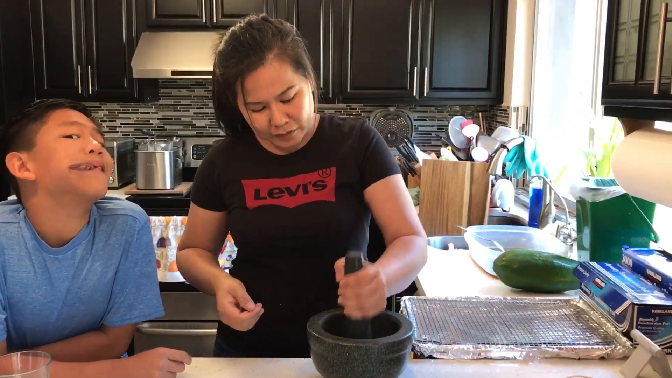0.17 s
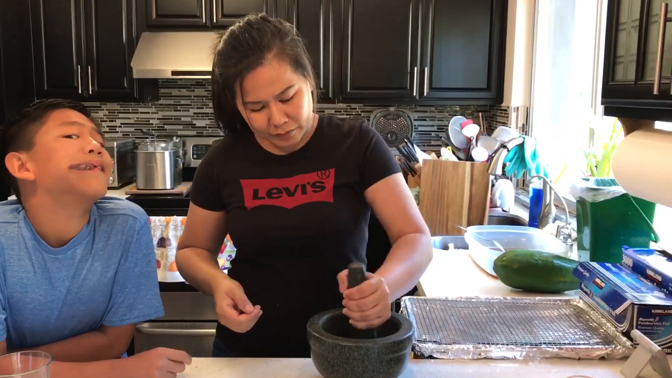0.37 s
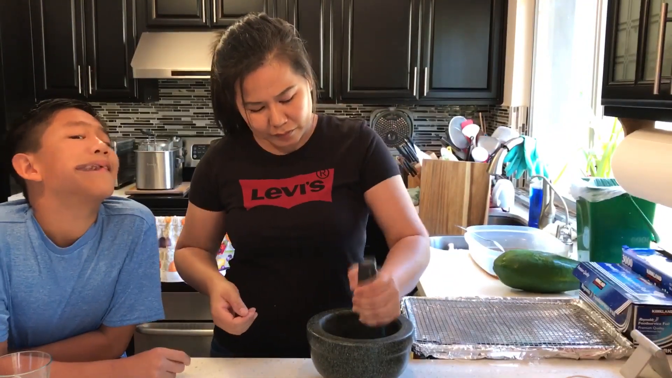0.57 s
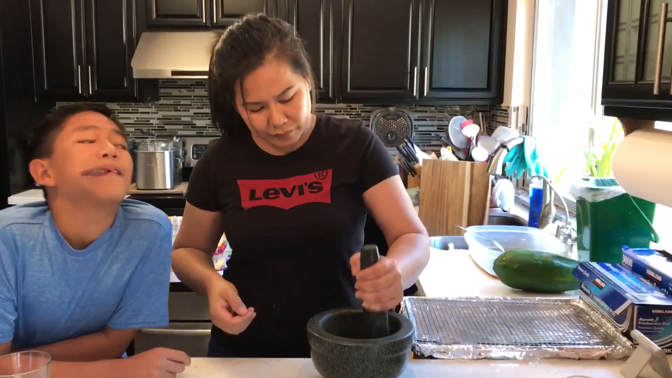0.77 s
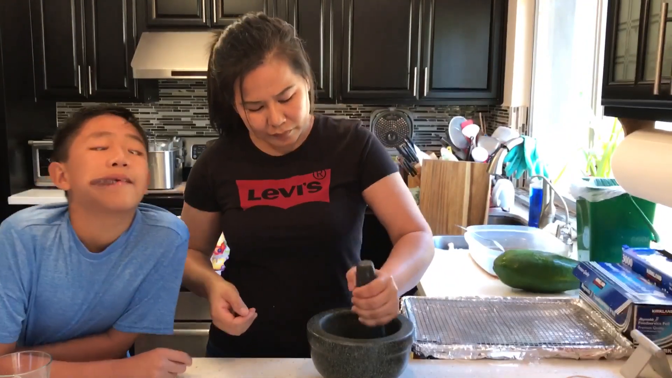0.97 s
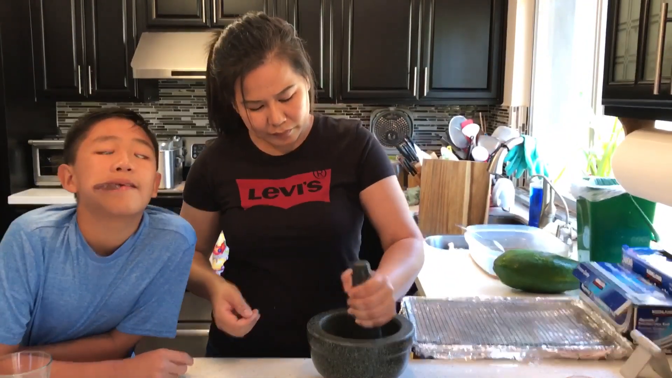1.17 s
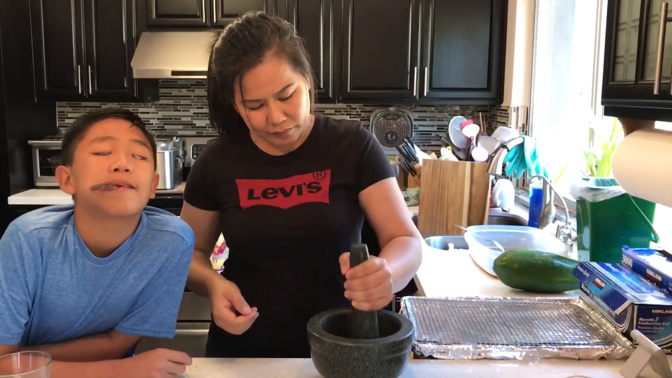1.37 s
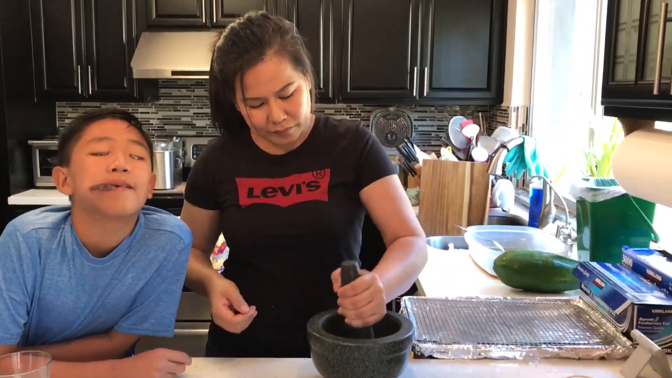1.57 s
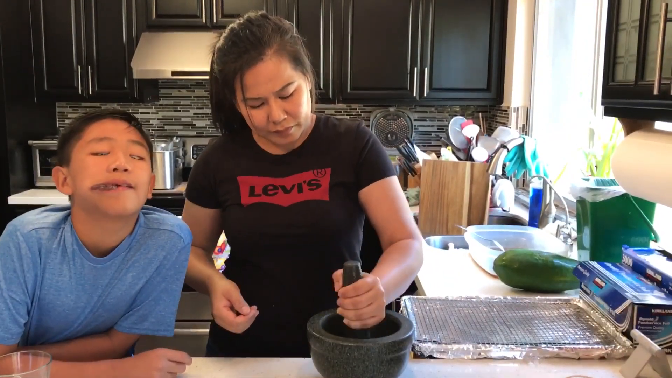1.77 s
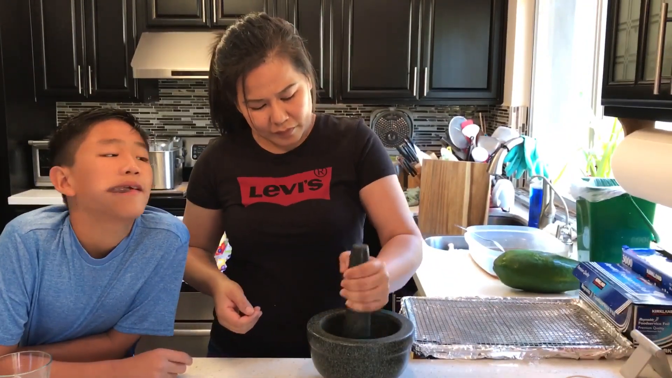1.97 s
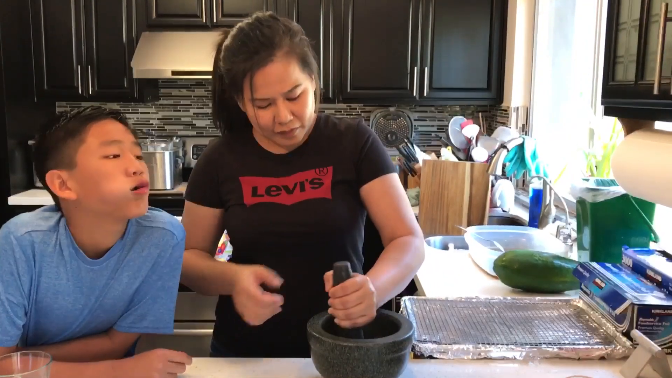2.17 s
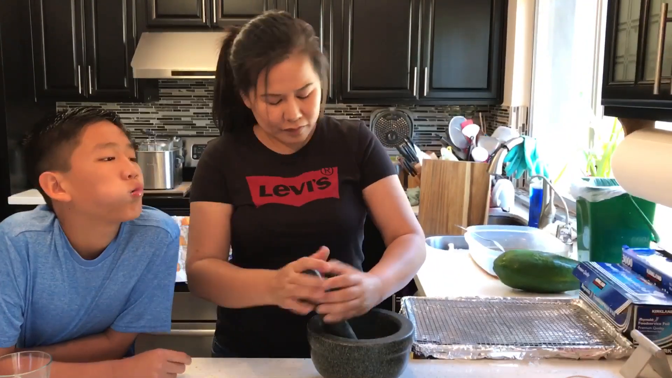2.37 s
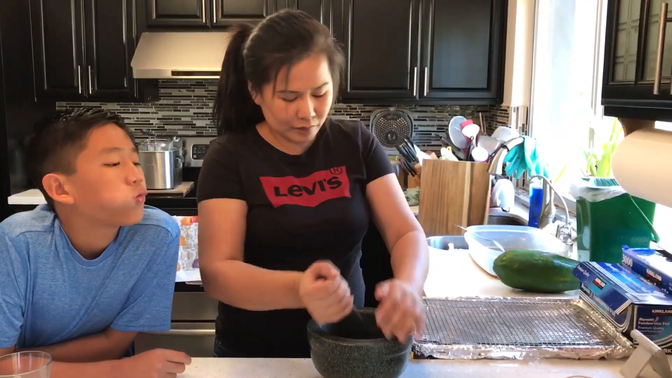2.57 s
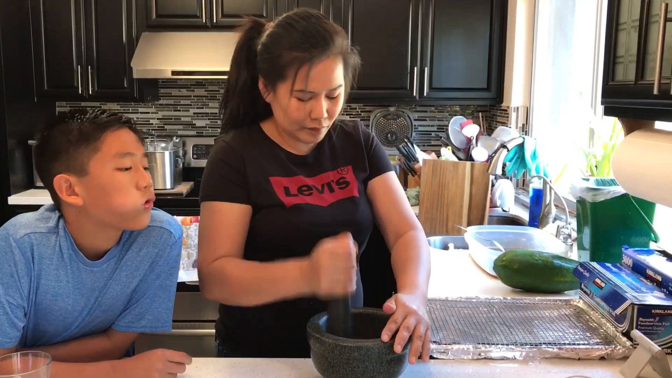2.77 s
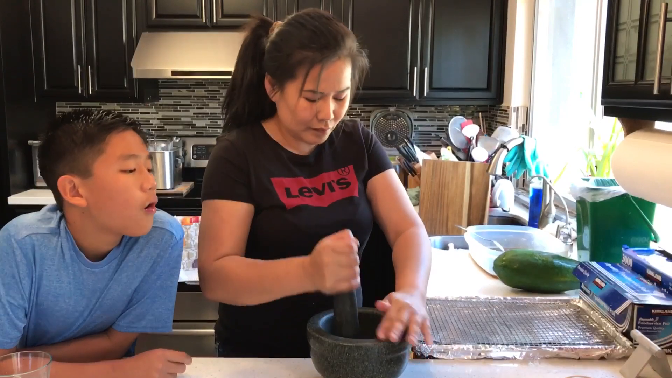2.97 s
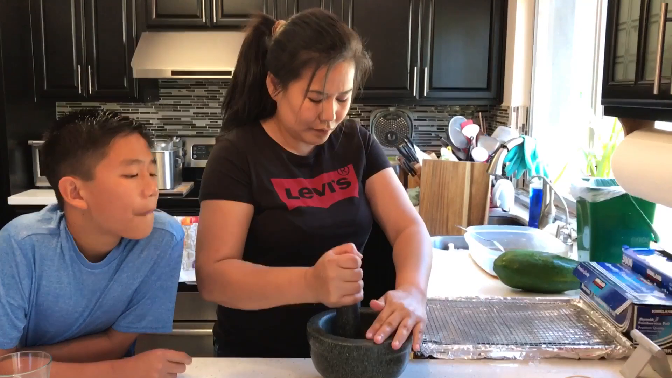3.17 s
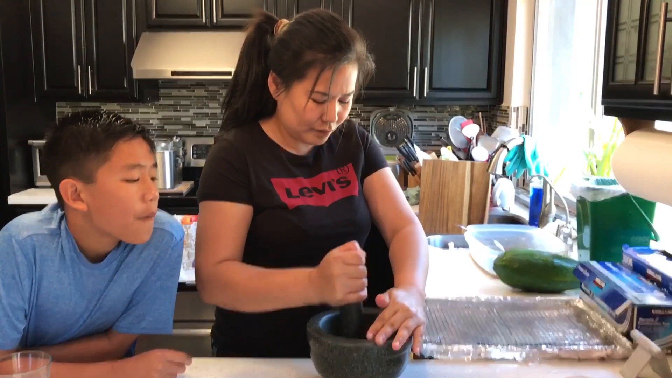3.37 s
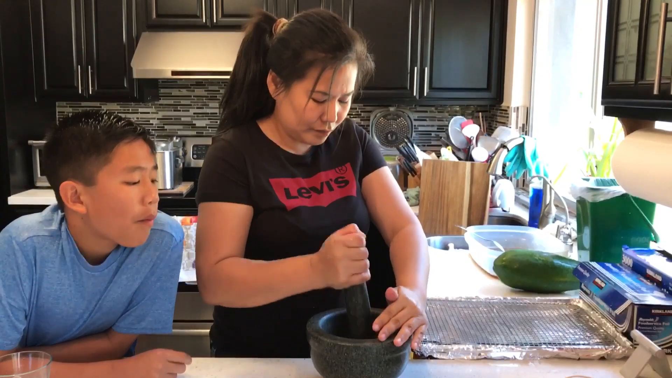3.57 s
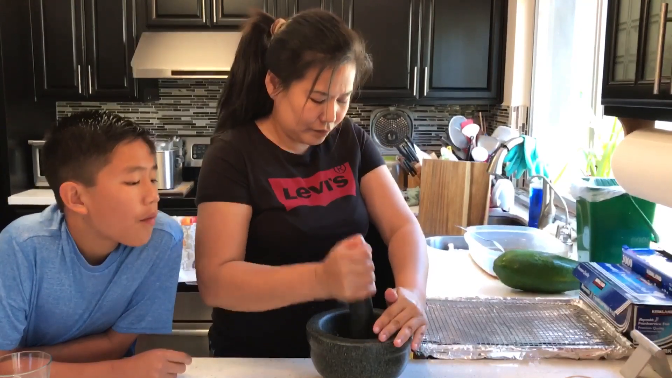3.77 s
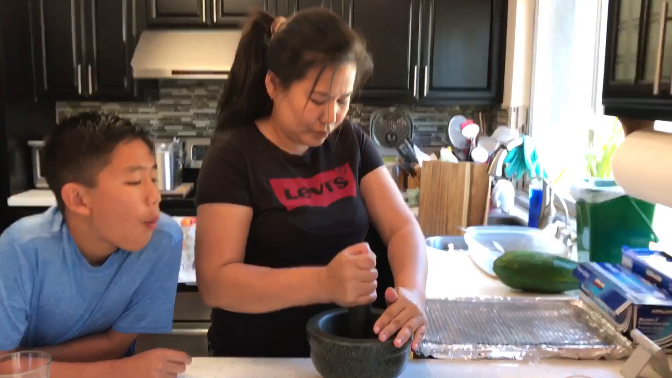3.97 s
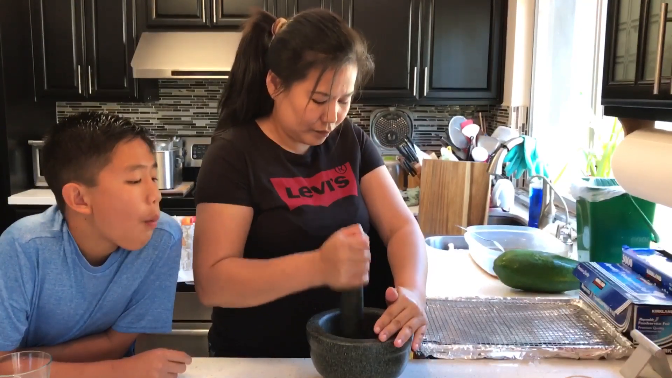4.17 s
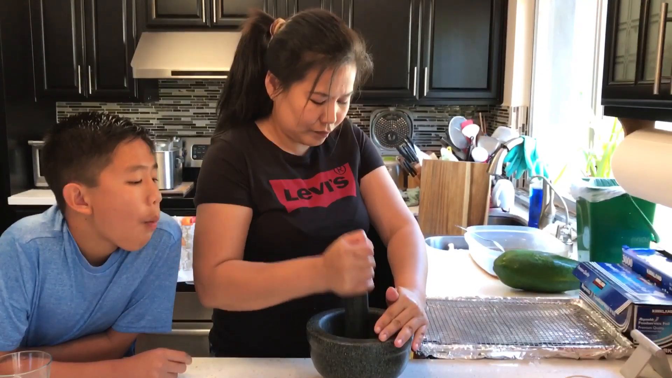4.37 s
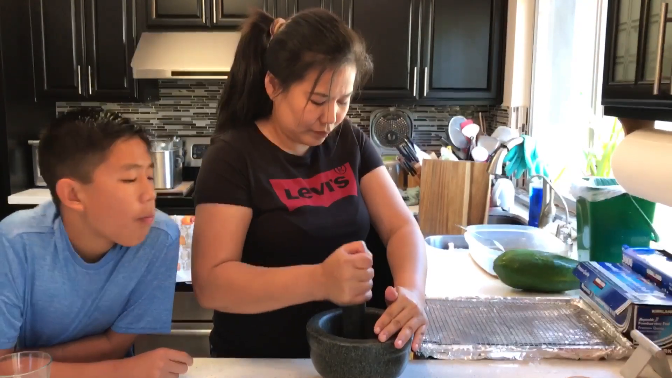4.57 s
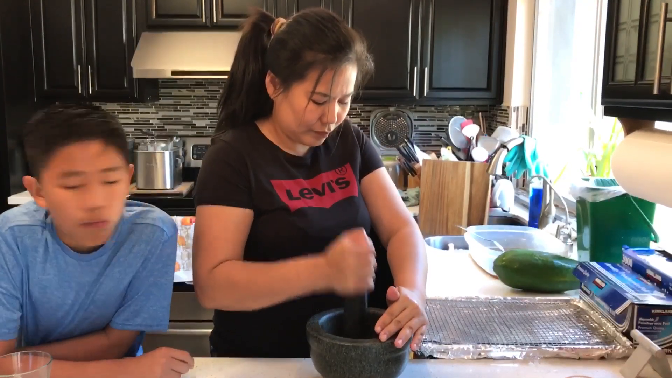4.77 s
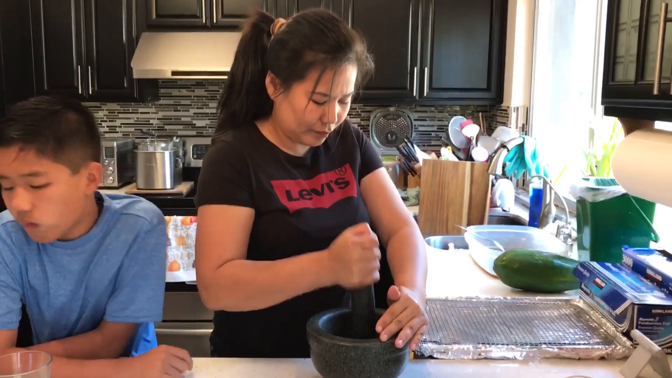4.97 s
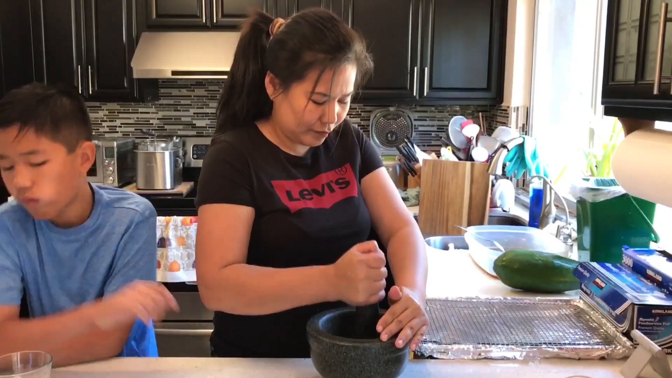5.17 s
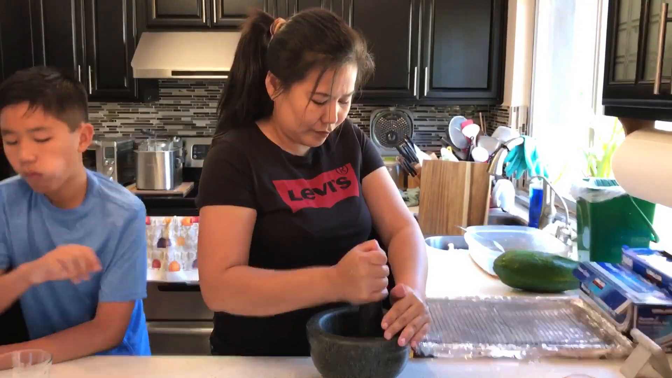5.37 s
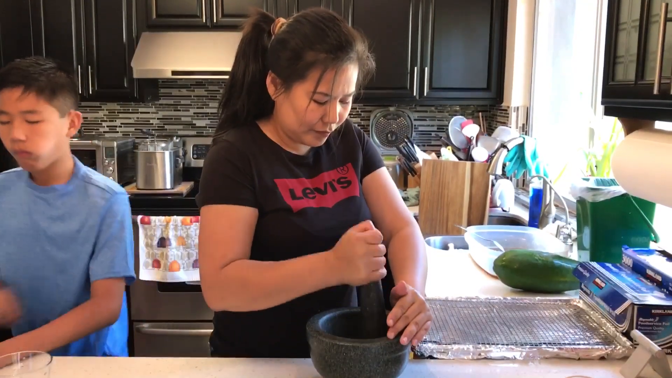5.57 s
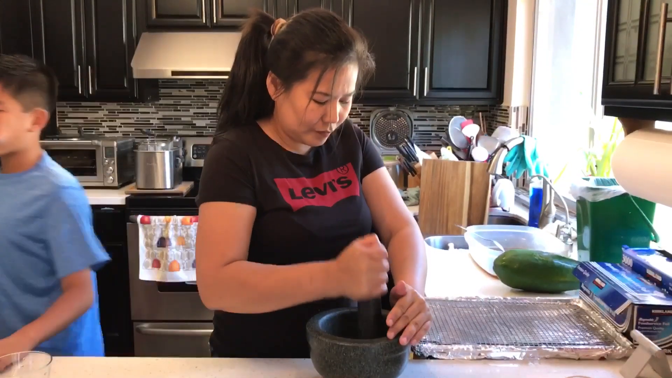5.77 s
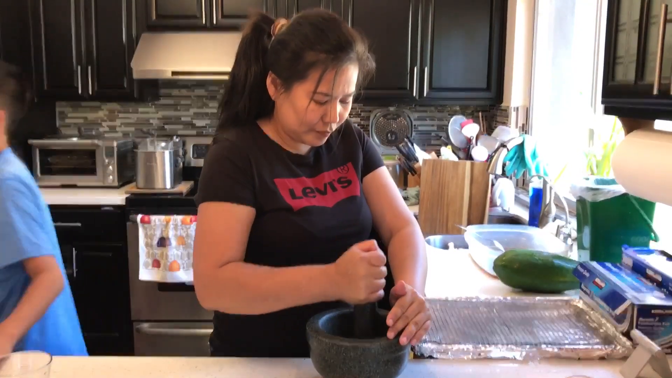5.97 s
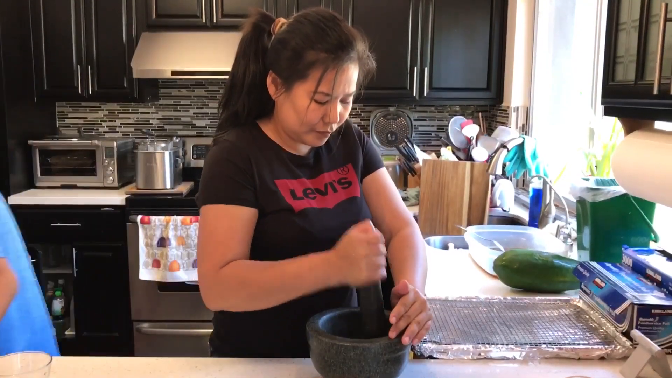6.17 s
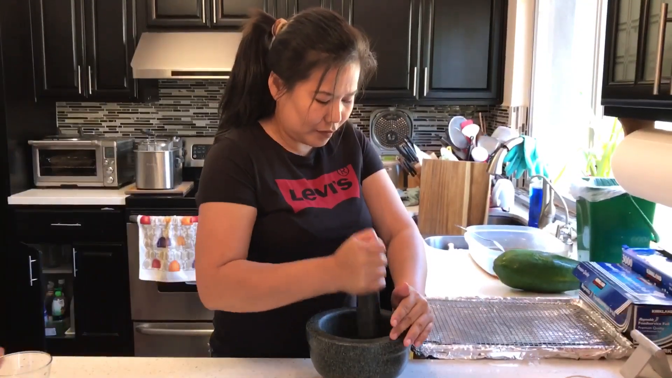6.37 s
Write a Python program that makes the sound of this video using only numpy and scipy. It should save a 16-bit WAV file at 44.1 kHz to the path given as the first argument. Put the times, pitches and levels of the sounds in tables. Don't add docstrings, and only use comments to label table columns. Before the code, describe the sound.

Close to the microphone in a quiet home kitchen, a stone pestle crushes seeds in a stone mortar at over three blows a second, each a muffled knock, short hiss and low counter thump. Near two seconds bare stone rings sharply; hands shift and seeds tick in a pause. A bright clink restarts the pounding, steady, louder and grittier to the end.

```python
import sys
import numpy as np
from scipy import signal
from scipy.fft import rfft, irfft
from scipy.io import wavfile
from scipy.ndimage import uniform_filter1d

SR = 44100
rng = np.random.default_rng(int(sys.argv[2]) if len(sys.argv) > 2 else 0)


def level_to_linear(level):
    exponent = np.asarray(level, float) / 20
    return 10 ** exponent


def to_wav(sig):
    pcm = np.clip(np.atleast_2d(sig), -1, 1) * 32767
    pcm = np.round(pcm).astype(np.int16)
    wavfile.write(sys.argv[1], SR, pcm.T)


N = 282460


def rms_one(x):
    return x / np.sqrt(np.mean(x ** 2) + 1e-20)


def at_hz(points, hz, column=1):
    points = np.array(points)
    return np.interp(np.log(hz), np.log(points[:, 0]), points[:, column])


def filtered(x, order, edge_hz, kind):
    return signal.sosfilt(signal.butter(order, edge_hz, kind, fs=SR, output="sos"), x)


def coloured(spectrum, size):
    hz = np.arange(size // 2 + 1) * SR / size + 0.00083
    white = rfft(rng.standard_normal(size))
    return rms_one(irfft(white * level_to_linear(at_hz(spectrum, hz)), size))


def clicks(times, gains):
    out = np.full(N, 1e-18)
    samples = (np.asarray(times) * SR).astype(int)
    np.add.at(out, np.clip(samples, 0, N - 1), gains)
    return out


def ring(force, hz, t60):
    radius, turn = level_to_linear(-60 / (t60 * SR)), 2 * np.pi * hz / SR
    return signal.lfilter([0, np.sin(turn)], [1, -2 * radius * np.cos(turn), radius * radius], force)


def swell(force, rise_s, fall_s):
    rise, fall = np.exp(-1 / (rise_s * SR)), np.exp(-1 / (fall_s * SR))
    falling = signal.lfilter([1], [1, -fall], force)
    return signal.lfilter([1 - rise], [1, -rise], falling)


# (frequency [Hz], level [dB per Hz])
ROOM_TONE = [(18, -24.5), (30, 21.5), (131, 4), (161, -10.5), (194, -8), (394, -18), (437, -10.5),
             (512, -21), (866, -17.5), (1040, -17.5), (2120, -29), (12300, -38.5), (16000, -38)]
# (time [s], activity [dB])
BODIES_MOVING = [
    (0, 11.5),
    (.25, -6),
    (.68, -17),
    (1.62, -2),
    (2.49, 2),
    (2.9, -7.5),
    (3.4, 2),
    (5.3, -2),
    (6.4, 4.5),
]
# (time [s], rustle level [dB])
SLEEVE_RUSTLE = [
    (0, -56),
    (1.6, -60.5),
    (1.9, -52),
    (2.5, -49.5),
    (2.75, -58.5),
    (3.1, -53),
    (5.6, -55.5),
    (6.3, -48.5),
]
# (time [s], shuffle level [dB])
HAND_SHUFFLE = [
    (2.40, -39.5),
    (2.53, -36),
    (2.599, -39.5),
]
# (frequency [Hz], level [dB per Hz])
GRIP_COLOUR = [(35, -20), (60, -7), (149, -5), (338, -12), (389, -27.5), (803, -19), (903, -29),
               (1010, -16), (1110, -34.5), (16000, -43.5)]


def background():
    t = np.arange(N) / SR
    rumble_db = -54 + np.interp(t, *np.transpose(BODIES_MOVING))
    rustle_db = np.interp(t, *np.transpose(SLEEVE_RUSTLE))
    tone = coloured(ROOM_TONE, N)
    rumble = level_to_linear(rumble_db) * rms_one(filtered(tone, 4, 140, "low"))
    rustle = level_to_linear(rustle_db) * rms_one(filtered(tone, 4, 140, "high"))
    s, shuffle_db = np.transpose(HAND_SHUFFLE)
    rub = swell(clicks(s, level_to_linear(shuffle_db + 4.5)), rise_s=0.032, fall_s=0.022)
    return rumble + rustle + rub * coloured(GRIP_COLOUR, N)


# (frequency [Hz], t60 [s], level [dB])
KITCHEN_TAIL = [(295, 0.34, 4), (596, 0.39, -6), (1163, 0.38, -7), (2244, 0.45, -4), (4840, 0.46, -16.5),
                (9300, 0.087, 1), (15200, 0.1, -15)]


def kitchen(x):
    t = np.arange(SR) / SR
    white, tail = rng.standard_normal((2, len(t))), 0
    edges = 100 * 2 ** np.arange(0, 7.6, .5)
    for k, (low, high) in enumerate(zip(edges, edges[1:])):
        hz = np.sqrt(low * high)
        band = filtered(white[k % 2], 2, [low, high], "band")
        fading_db = at_hz(KITCHEN_TAIL, hz, column=2) - 60 * t / at_hz(KITCHEN_TAIL, hz)
        tail = tail + band * level_to_linear(fading_db)
    onset = 1 - np.exp(-np.maximum(t - .004, 0) / 0.001)
    return signal.fftconvolve(x, level_to_linear(-32.5) * tail * onset)[:N]


def diffuse(x):
    white, tail = rng.standard_normal((2, N)), 0
    edges = 280 * 2 ** np.arange(0, 6.1, 1 / 3)
    for k, (low, high) in enumerate(zip(edges, edges[1:])):
        hz = np.sqrt(low * high)
        fall_s = at_hz(KITCHEN_TAIL, hz) / (6 * np.log(10))
        energy = swell(filtered(x, 2, [low, high], "band") ** 2, 0.002, fall_s)
        band = rms_one(filtered(white[k % 2], 2, [low, high], "band"))
        tail = tail + level_to_linear(at_hz(KITCHEN_TAIL, hz, column=2)) * np.sqrt(energy) * band
    return level_to_linear(-26.5) * tail


# (time [s], counter thud [dB], knock [dB], bowl body [dB], seed crunch [dB])
PESTLE_BLOWS = [(.108, -21.5, -26.5, -27, -24.5), (.396, -28.5, -27, -26, -20),
                (.676, -18.5, -29, -29, -24.5), (.961, -15.5, -19.5, -22.5, -25.5),
                (1.255, -19.5, -30, -33, -26), (1.554, -22, -27, -24, -24),
                (1.757, -46, -21.5, -31.5, -61.5), (1.85, -20.5, -5, -11, -27),
                (2.136, -20.5, -11.5, -5.5, -31), (2.873, -28, -8, -19, -57),
                (3.173, -16.5, -15, -15.5, -25), (3.457, -16.5, -15, -20, -20.5),
                (3.741, -14, -13, -18, -24.5), (4.031, -16, -12, -19, -20.5),
                (4.31, -20.5, -18.5, -19, -23), (4.601, -14, -10.5, -18.5, -25),
                (4.889, -15.5, -26.5, -20, -22.5), (5.171, -19, -25.5, -24.5, -21.5),
                (5.451, -17.5, -31, -45.5, -23), (5.74, -17.5, -24.5, -19, -21.5),
                (6.028, -12.5, -10, -18, -23.5), (6.314, -18.5, -20, -24.5, -19.5)]
# (time [s], loss [dB])
GLANCING_BLOWS = [
    (.108, 3),
    (.396, 7),
    (1.255, 1),
    (1.757, 25.5),
    (1.85, 17),
    (2.874, 5),
]
# (frequency [Hz], level [dB], t60 [s])
COUNTER_MODES = [(48.27, -19, 0.27), (60, -21.5, 0.38), (71.74, -18.5, 0.65), (96.66, -15.5, 0.33),
                 (131, -13, 0.26), (139.3, -6.5, 0.054), (152.24, 2.5, 0.16), (187, -4, 0.12),
                 (201.7, -1.5, 0.17), (223.7, -9.5, 0.6), (236.4, 1.5, 0.099), (293.5, -21.5, 0.087),
                 (355, -24, .2), (395, -19, .1) ]
# (delay [s], level [dB])
FLOOR_ANSWERS = [
    (0.019, -7.5),
    (.033, -17),
    (0.056, -7.5),
]


def counter():
    weight_db, thud_lag_s, deep_lag_s = -12.5, 0.0018, .015
    s, thud_db = np.transpose(PESTLE_BLOWS)[:2]
    deep_db = np.full(len(s), weight_db)
    for at_s, loss_db in GLANCING_BLOWS:
        deep_db[np.argmin(abs(s - at_s))] -= loss_db
    thud = 0
    for k, (hz, level_db, t60) in enumerate(COUNTER_MODES):
        deep = hz < 135
        own_db = level_db + 0.5 + rng.normal(0, 1, len(s)) + (deep_db if deep else thud_db)
        force = clicks(s + thud_lag_s + deep_lag_s * deep, level_to_linear(own_db))
        thud = thud + (-1) ** k * ring(force, hz, t60)
    delay_s, answer_db = np.transpose(FLOOR_ANSWERS)
    answers = clicks(delay_s, level_to_linear(answer_db))[:SR // 8]
    return thud + signal.fftconvolve(thud, answers)[:N]


# (time [s], ring level [dB], upper modes [dB])
STONE_TOUCHES = [(.109, -48, 21.5), (.397, -78, 21.5), (0.959, -70.5, 44), (1.257, -45.5, 16.5),
                 (1.556, -64.5, 39.5), (1.759, -14.5, -7), (1.776, -26, -2), (1.822, -34, -6),
                 (1.850, -11, -1), (2.850, -51.5, -19.5), (2.872, -6, -13.5), (3.114, -56, 4),
                 (3.993, -40, -20), (4.887, -62, 18), (6.027, -62, 10)]
# (frequency [Hz], level [dB], t60 [s])
PESTLE_MODES = [(2870, -18, .04), (3095, 2, .04), (3070, -13, .22), (3112, -9, .36), (3330, -16, .04),
                (4600, -26, .3), (4640, -24, .33), (6800, -24, .06), (6950, -26, .05), (8750, -21, .04),
                (10700, -33, .04), (11650, -32, .05), (12600, -30, .03)]


def pestle():
    s, ring_db, upper_db = np.transpose(STONE_TOUCHES)
    out = 0
    for hz, level_db, t60 in PESTLE_MODES:
        force = clicks(s, level_to_linear(ring_db + level_db + upper_db * (hz > 4000)))
        out = out + filtered(ring(force, hz, t60), 2, [hz / 1.15, hz * 1.15], "band")
    waver = uniform_filter1d(uniform_filter1d(rng.standard_normal(N), size=500), size=500)
    return out * level_to_linear(2.2 * rms_one(waver))


# (time [s], knock [dB], bowl body [dB], seed crunch [dB])
STONE_ROCKS = [
    (.692, -22, -21.5, -63),
    (1.275, -21, -23, -50),
    (1.774, -29.5, -25.5, -69.5),
    (2.882, -20, -32, -18.5),
    (3.112, -34.5, -60, -81),
    (4.907, -25.5, -35, -52),
    (5.465, -66, -29.5, -72),
]
# (time [s], tick level [dB])
SEED_TICKS = [(2.471, -46.5), (2.583, -48), (2.618, -38), (3.993, -55.5), (4.249, -69.5), (4.496, -56.5),
              (4.529, -55), (2.738, -55.5), (3.114, -47.5), (3.9, -70), (6.29, -59.5)]
# (frequency [Hz], level [dB per Hz])
CRUNCH_COLOUR = [(1180, 11.5), (2000, -42), (3340, 3.5), (4120, 1.5), (4650, 5.5), (7060, 5), (8050, -4.5),
                 (8550, 7), (10400, 1.5), (12200, 7.5), (16000, 1)]


def seeds():
    burst_lead_s, squeeze_s = 0.0028, 0.0027
    crushing = [(row[0] - burst_lead_s, row[-1]) for row in PESTLE_BLOWS + STONE_ROCKS]
    s, crunch_db = np.transpose(crushing)
    burst = swell(clicks(s, level_to_linear(crunch_db)), 0.00099, 0.0028)
    squeeze = swell(clicks(s - squeeze_s, level_to_linear(crunch_db - 20.0)), 0.00049, 0.0031)
    spray = swell(clicks(s, level_to_linear(crunch_db - 13.5)), 0.046, 0.022)
    tick_s, tick_db = np.transpose(SEED_TICKS)
    ticks = swell(clicks(tick_s, level_to_linear(tick_db)), 0.0015, 0.0038)
    grain = level_to_linear(2.43 * uniform_filter1d(rng.standard_normal(N), size=36) * 4.9)
    return (burst + squeeze + spray + ticks) * grain * coloured(CRUNCH_COLOUR, N)


def contacts():
    s, _, knock_db, body_db, crunch_db = np.transpose(PESTLE_BLOWS)
    rock_s, rock_db, rock_body_db, _ = np.transpose(STONE_ROCKS)
    slip_s = s + .006 * rng.uniform(.8, 1.2, len(s))
    times = np.r_[s, slip_s, rock_s]
    cushioned = crunch_db > -28.5
    landing_db, slip_db = knock_db - 4 * cushioned, knock_db - 8 * ~cushioned
    knocks_db = np.r_[landing_db, slip_db, rock_db]
    bodies_db = np.r_[body_db, body_db - 6, rock_body_db]
    slip_crack_db, whole_seeds_db, grit_forms_s = -17, -22, 0.41
    crack_db = -7.5 + 0.97 * np.r_[knock_db, knock_db + slip_crack_db, rock_db + slip_crack_db]
    crack_db = crack_db + whole_seeds_db * np.exp(-(times / grit_forms_s) ** 2)
    return times, knocks_db, bodies_db, crack_db


# (frequency [Hz], level [dB], t60 [s])
BOWL_MODES = [(242.7, -1.5, 0.06), (341, -10.5, 0.0087), (457, -8, 0.023), (620, -1.5, 0.02),
              (632.1, -23.5, 0.24), (737.3, -36, 0.44), (998, -27.5, 0.27), (829.4, 0, 0.025),
              (1024, 0, 0.034), (1334, 6.5, 0.0074), (1675, 0.5, 0.013), (1970, -9.5, 0.024),
              (2430, -9, 0.02)]


def bowl():
    s, knock_db, body_db, crack_db = contacts()
    scatter_db = rng.normal(0, 2.2, (len(s), len(BOWL_MODES)))
    out = 0
    for k, (hz, level_db, t60) in enumerate(BOWL_MODES):
        if hz < 700:
            blow_db, sign = body_db + 4.0, 1
        else:
            blow_db, sign = knock_db - 1.5, (-1) ** k
        force = clicks(s, level_to_linear(blow_db + level_db + scatter_db[:, k]))
        out = out + sign * ring(force, hz, t60)
    knock = filtered(out, 2, [200, 2400], "band")
    crack = swell(clicks(s, level_to_linear(crack_db + 10.0)), 0.0024, 0.0043) * rng.standard_normal(N)
    return knock + filtered(crack, 3, [1900, 4400], "band")


def scene():
    knocks, tones, thud = bowl() + seeds(), pestle(), counter()
    alike = knocks * level_to_linear(1.5)
    walls = diffuse(knocks) + kitchen(tones + alike + level_to_linear(-13) * thud)
    return (knocks + tones + thud + walls + background())[None]


def top_cut(x):
    return signal.sosfilt(signal.butter(12, 15750, fs=SR, output="sos"), x)


def record(dry):
    mic = filtered(dry, 6, 40, "high")
    mic = signal.sosfilt(signal.cheby2(10, 40, 16700, fs=SR, output="sos"), mic)
    mix = 1.073 * np.tanh(mic / 1.503)
    return top_cut(mix)


dry = scene()
out = record(dry)
to_wav(out)
```